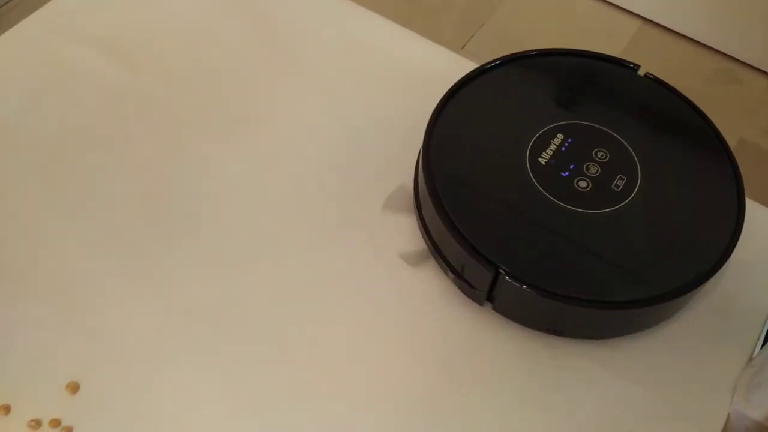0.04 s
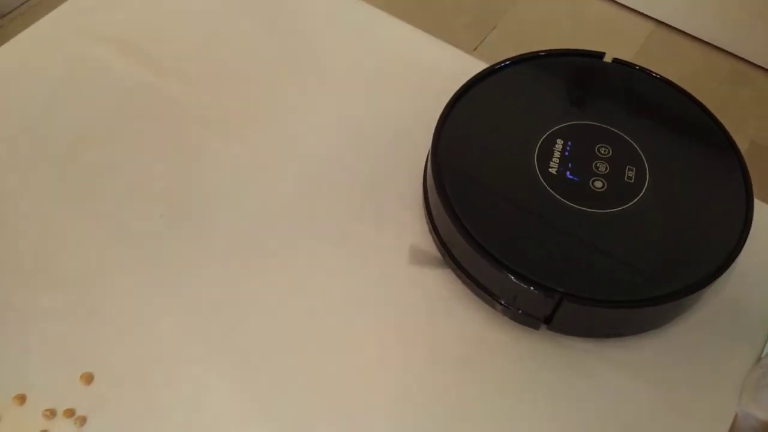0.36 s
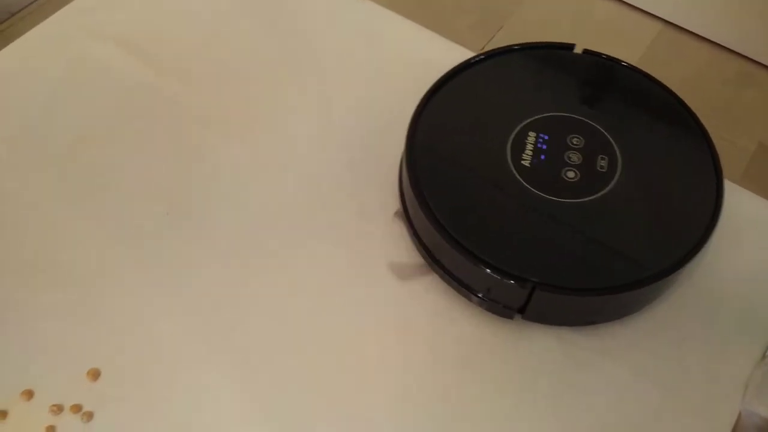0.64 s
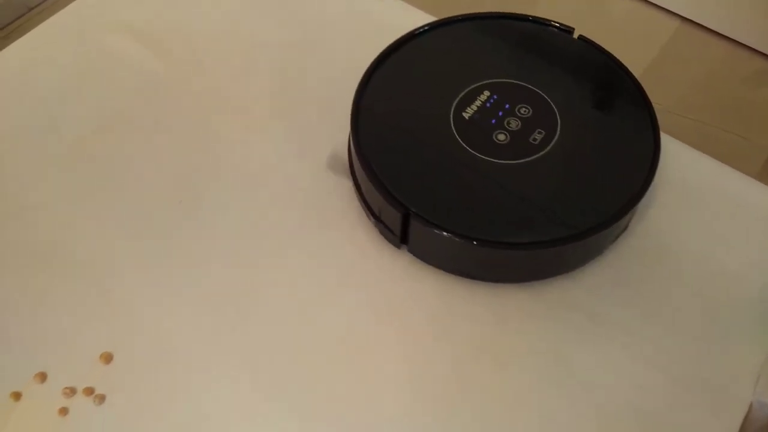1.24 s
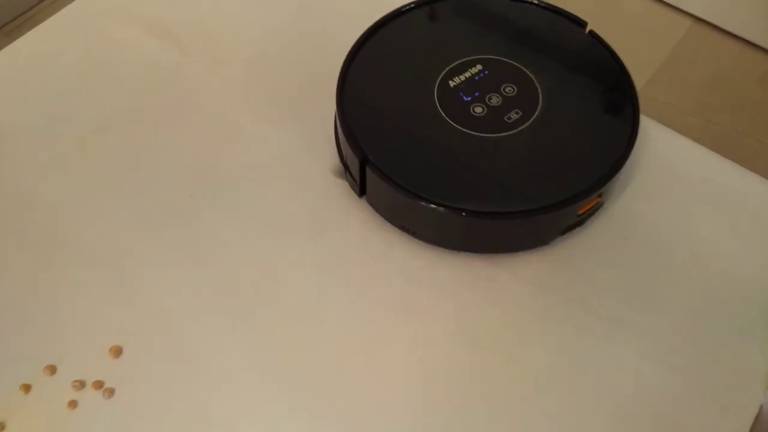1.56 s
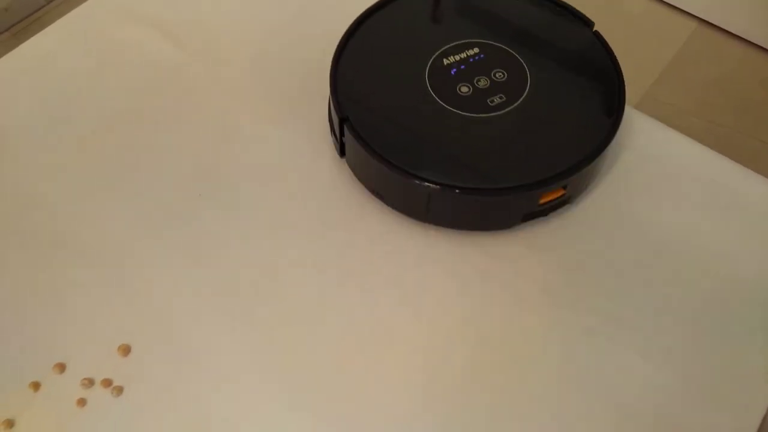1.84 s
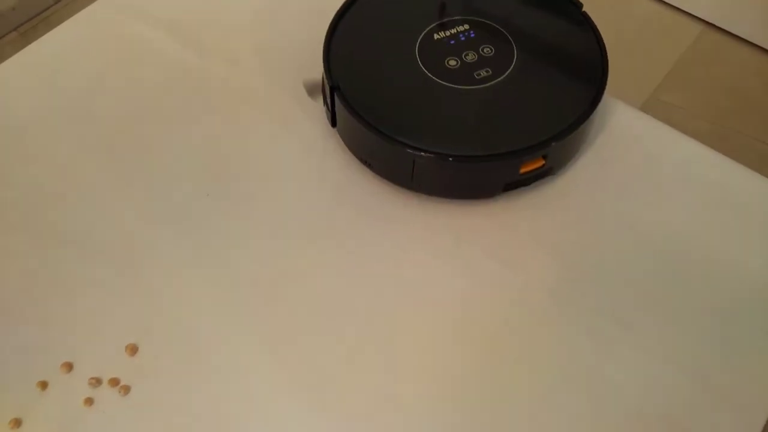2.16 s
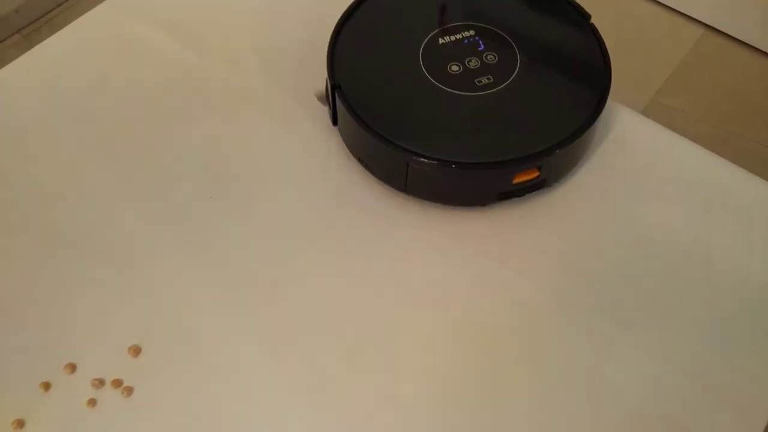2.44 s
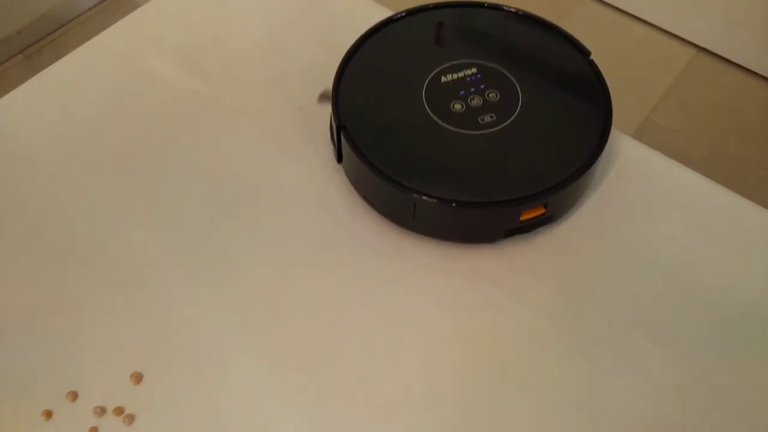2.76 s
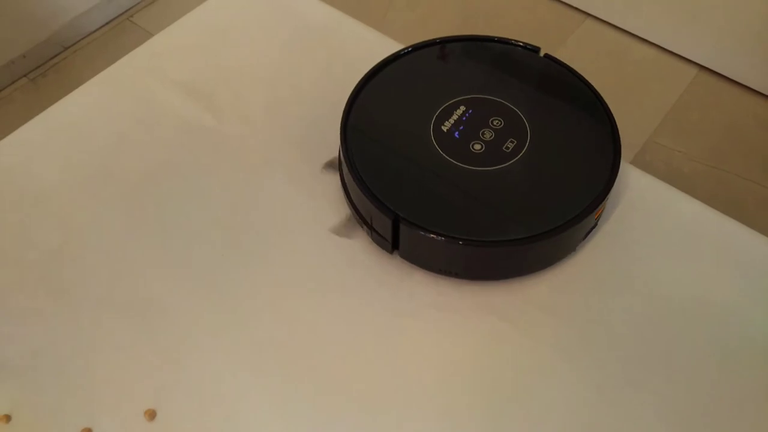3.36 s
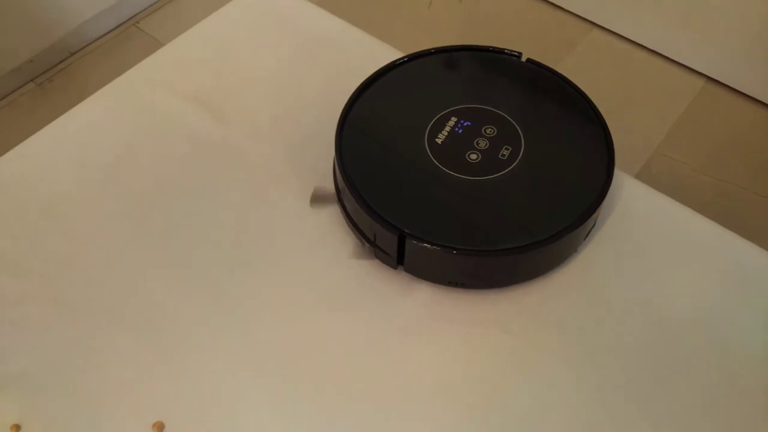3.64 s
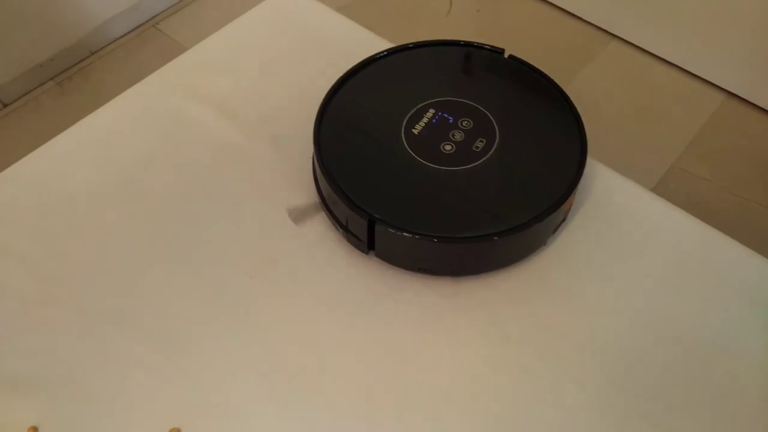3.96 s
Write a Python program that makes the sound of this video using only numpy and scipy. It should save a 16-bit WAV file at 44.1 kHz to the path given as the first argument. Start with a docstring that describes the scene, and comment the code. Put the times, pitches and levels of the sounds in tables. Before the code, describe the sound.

A robot vacuum runs on a smooth indoor floor about a metre away. Its fan and small motors whine steadily over rushing air, with brief faint squeals and soft bumps, while a side brush hisses on the left.

```python
"""On a smooth floor in a room, a robot vacuum turns about a metre from the listener.
Its fan and small motors whine at harmonics of their shaft speeds, over the broadband rush of turbulent air.
The roller brush and gears drive the plastic shell into resonance, and rubbing parts squeal briefly.
The side brush hisses by friction on the left, swelling each time a tuft sweeps out from under the body."""
import sys
import numpy as np
from scipy import signal
from scipy.fft import rfft, irfft
from scipy.io import wavfile

SR = 44100
rng = np.random.default_rng(int(sys.argv[2]) if len(sys.argv) > 2 else 0)


def master_out(mix):
    """Clip the mix to full scale and print it as 16-bit PCM to the path in sys.argv[1]."""
    frames = np.transpose(np.atleast_2d(mix))
    ceiling = np.clip(frames, -1, 1)
    pcm = np.round(ceiling * 32767).astype(np.int16)
    wavfile.write(sys.argv[1], SR, pcm)


N = 176400

# shaft speeds: (time [s], rotation rate [Hz])
FAN_SPEED = [(0, 166.2), (.22, 165.1), (.35, 165.8), (.52, 164.6), (.9, 165.7), (1.5, 166.3), (1.65, 166),
             (2, 166.7), (2.9, 167), (3.25, 166.9), (3.45, 166.3), (3.62, 165), (3.8, 166), (4, 165.7)]
ROLLER_SPEED = [(0, 207.7), (.5, 207), (1.3, 211.2), (2.2, 212.4), (3, 210.6), (4, 209.4)]
WHEEL_SPEED = [(0, 274), (.6, 273), (1.2, 275.3), (1.7, 274), (2.05, 275), (2.35, 277), (2.8, 273.5),
               (3.1, 273.5), (3.6, 271), (3.75, 274), (4, 274)]
# meshing in the pushing wheel's gearbox: (time [s], tooth rate [Hz])
TOOTH_RATE = [(0, 680), (.85, 682), (.95, 692), (1.08, 693), (1.25, 709), (1.36, 700), (1.5, 707),
              (1.75, 694), (1.85, 692), (2.3, 712), (3.6, 700), (3.72, 688), (3.8, 718), (3.95, 708),
              (4, 708)]
# harmonics of those rates: (multiple [1], base level [dB], left minus right [dB])
FAN_HUM = [(4, -45, 2)]
FAN_WHINE = [(8, -44, -1.1)]
FAN_OVERTONES = [(6, -61, -23), (9, -50, -13), (10, -62, -10), (11, -61.5, 12), (12, -50.5, 3),
                 (18, -67.5, 20)]
ROLLER_WHINE = [(2, -55.5, -4), (4, -47.5, 1)]
WHEEL_HUM = [(2, -46.5, 2), (4, -51.5, -11)]
WHEEL_WHINE = [(6, -47, 5.6)]
GEARBOX_WHINE = [(1, -40.5, -1), (2, -51, -3), (3, -61, 6)]
GEARBOX_RASP = [(6, -52, 6), (7, -57, 7)]
# steady meshing tones: (frequency [Hz], level [dB], left minus right [dB])
GEAR_TONES = [(266.4, -52, 6), (284, -52, -3), (345.8, -50, 3), (1053, -57, -13), (1183, -53.5, -9),
              (1250, -52, -14.5), (1744, -60.5, 12), (2106, -70, -12)]

# resonances excited by noise: (frequency [Hz], nominal width [Hz], base level [dB])
SHELL_BASS_MODES = [(260, 20, -48), (321.2, 11, -51)]
RATTLE_MODES = [(699, 36, -47), (750, 54, -41.5), (835, 63, -43.5)]
DUCT_MODES = [(1560, 220, -51.5), (2770, 260, -47.5)]
WHIR_MODES = [(1690, 39, -48.5)]
BEARING_MODES = [(2020, 110, -45)]
GEAR_HISS_MODES = [(4480, 280, -51.5), (5000, 1000, -54.5)]
# noise spectra: (frequency [Hz], relative spectral density [dB])
AIR_SPECTRUM = [(25, -42), (80, -57), (115, -47), (160, -20), (220, -5), (370, -2.5), (490, -4.5), (620, 0),
                (920, 1), (1050, -2), (1300, 2.5), (1850, -1.5), (2400, -5), (3300, -6), (4500, -9),
                (5600, -10), (6800, -12.5), (10000, -16), (16000, -26)]
BRISTLE_SPECTRUM = [(2000, -43), (4000, -15.5), (7000, -12), (9400, -7.5), (10600, -2), (11600, 1.5),
                    (12800, -1), (14200, -5), (15600, -13.5)]

# rise and fall of each part about its base level as the body turns: (time [s], gain [dB])
FAN_HUM_GAIN = [(0, -4), (.22, 0.5), (.42, -4.5), (.6, 3.5), (1, -9), (1.7, -1), (2.5, -3), (3.35, -0.5),
                (3.6, 1.5), (3.75, 2), (4, -3)]
FAN_WHINE_GAIN = [(0, -5), (.27, 0), (.4, -13), (.62, 0.5), (1, 1.5), (1.4, 6), (1.65, 0.5), (1.95, 2),
                  (2.1, -14), (2.6, -16), (2.9, -1.5), (3.25, -2), (3.45, -7), (3.6, 0.5), (4, -3)]
FAN_OVERTONE_GAIN = [(0, -2), (.7, 2.5), (1.25, 2), (1.8, 2.5), (2.4, 1.5), (3.2, -1), (4, 1)]
ROLLER_GAIN = [(0, -6), (.9, -6), (1.3, -2), (2.2, 0), (3, 2), (3.7, 2), (4, -1)]
WHEEL_HUM_GAIN = [(0, -8), (.6, -6), (1.3, -5), (2, -2), (2.6, -2), (2.8, 0), (3.2, 0), (3.6, 1), (3.8, -4),
                  (4, -5)]
WHEEL_WHINE_GAIN = [(0, -5), (.85, -8), (1.2, 3), (1.55, -12), (1.8, -5), (2.35, 1.5), (2.6, -8), (4, -12)]
GEARBOX_WHINE_GAIN = [(0, -20), (.8, -16), (.95, 0), (1.25, 2), (1.36, -2), (1.52, -.5), (1.75, -2),
                      (2, -15), (3.6, -18), (3.8, -9), (4, -9)]
GEARBOX_RASP_GAIN = [(0, -18), (.8, -14), (.97, 2), (1.25, 0), (1.6, -4), (1.82, 4), (2, -15), (3.6, -18),
                     (3.75, 1), (4, 3)]
SHELL_BASS_GAIN = [(0, 4), (1, -2), (2, 0), (2.8, 0.5), (4, 1.5)]
RATTLE_GAIN = [(0, -3), (.45, -10.5), (.62, 0.5), (.85, -4.5), (1.2, 1), (2, -1), (2.7, 1), (3.2, 0.5),
               (3.6, -2.5), (4, -7)]
WHIR_GAIN = [(0, 5), (.8, -36), (1.5, -6), (2.1, 7.5), (2.5, 7), (2.8, 2), (3.2, 4), (3.5, -7), (3.85, 6)]
BEARING_GAIN = [(0, -1), (.35, 3), (.9, 3.5), (1.4, -3), (1.8, -4), (2.6, 0.5), (3.3, 3.5), (4, -6)]
GEAR_HISS_GAIN = [(0, -18), (.5, -2), (1, 4), (1.6, 1), (2.1, 2), (3, -18), (3.6, -8), (3.9, 5), (4, 7)]
AIR_GAIN = [(0, -0.34), (.4, -0.85), (1.1, 1), (1.7, 0.58), (2.4, -0.33), (3.3, -0.57), (3.6, 0.081),
            (4, 1)]
# swell of the hiss at each sweep, greatest while the brush faces the listener: (time [s], rise [dB])
SWEEP_RISE = [(0, 2), (.5, 2), (.8, 3), (1.35, 3), (1.9, 0.5), (2.6, 0.5), (3.3, 0.5), (3.65, 1.3),
              (3.92, 2)]

# squeals of rubbing parts: (peak time [s], frequency [Hz], Gaussian half width [s], peak level [dB])
SQUEALS = [(.047, 832, .02, -37), (.118, 834, .014, -36), (.267, 833, .022, -33.5), (.36, 830, .018, -39.5),
           (.43, 830, .012, -40.5), (.515, 832, .01, -40), (.708, 836, .013, -33), (.798, 838, .014, -33),
           (1.045, 849, .01, -38), (1.121, 838, .012, -36), (1.19, 832, .014, -37), (2.03, 846, .014, -39),
           (2.275, 841, .012, -38), (2.64, 750, .016, -35), (2.66, 846, .012, -38), (2.743, 837, .012, -39),
           (2.915, 775, .012, -37), (2.952, 842, .012, -38), (3.061, 837, .012, -38),
           (3.236, 844, .013, -37), (1.196, 1995, .012, -38), (1.428, 2010, .009, -42),
           (.61, 4470, .016, -47), (.65, 4100, .014, -50), (1.46, 4450, .018, -48), (1.55, 4490, .016, -46)]
# booms of the shell when the chassis bumps: (peak time [s], frequency [Hz], peak level [dB])
BUMPS = [(.33, 335, -41), (1.245, 255, -39), (1.89, 274, -42), (2.482, 275, -39), (2.81, 269, -35),
         (2.963, 275, -41.5), (3.414, 273, -38), (3.525, 275, -41), (3.817, 258, -40), (3.885, 264, -39)]

# likeness of the sound at the two ears: (frequency [Hz], correlation [1])
EAR_COHERENCE = [(100, -0.5), (280, 0.7), (550, 0.36), (800, 0.9), (1200, 0), (2000, 0.05), (5000, 0),
                 (15000, -0.5)]
# balance of noise between the ears: (frequency [Hz], left minus right [dB])
EAR_BALANCE = [(100, 10), (200, 4), (300, 3.5), (550, -4.5), (1200, 3.5), (1800, 1.5), (3500, 2), (6000, 6),
               (12000, 5.5)]


def from_db(db):
    """Amplitude ratio: tenfold for every 20 dB."""
    return 10 ** (np.asarray(db) / 20)


def unit_power(x):
    """Normalisation to a mean square of one."""
    return x / np.sqrt(np.mean(x ** 2) + 1e-20)


def seconds():
    """Uniform sampling: the time of every sample."""
    return np.arange(N) / SR


def bins():
    """Fourier analysis: the frequency of every bin, at least 1 Hz."""
    return np.maximum(np.arange(N // 2 + 1) * SR / N, 1)


def in_time(rows):
    """Linear interpolation of (time [s], value) rows."""
    return np.interp(seconds(), *np.transpose(rows))


def envelope(rows):
    """Amplitude envelope from (time [s], gain [dB]) rows."""
    return from_db(in_time(rows))


def over_hz(rows):
    """Interpolation of (frequency [Hz], value) rows on a logarithmic axis."""
    hz, value = np.transpose(rows)
    return np.interp(np.log(bins()), np.log(hz), value)


def pan(db):
    """Interaural level difference as left and right gains."""
    return from_db(np.array([[.5], [-.5]]) * db)


def drift(corner_hz):
    """Low-pass noise: a random wander of unit spread."""
    spectrum = rfft(rng.standard_normal(N)) * (bins() > 1)
    return unit_power(irfft(spectrum / (1 + (bins() / corner_hz) ** 2), N))


def room_noise(colour):
    """Partial coherence: coloured noise of unit power whose likeness at the ears varies with frequency."""
    mid, side = rfft(rng.standard_normal((2, N)))
    coherence = over_hz(EAR_COHERENCE)
    ears = np.sqrt(1 + coherence) * mid + np.sqrt(1 - coherence) * side * np.array([[1], [-1]])
    return unit_power(irfft(ears * colour * pan(over_hz(EAR_BALANCE)), N))


def resonances(modes):
    """Resonance: noise excites steep-sided modes whose powers add."""
    f, power = bins(), 0
    for hz, width, db in modes:
        detuning = (f * f - hz * hz) / (f * width * 1.5)
        response = unit_power(1 / (1 + detuning ** 2))
        power = power + (from_db(db) * response) ** 2
    return np.sqrt(np.mean(power)) * room_noise(np.sqrt(power))


def phase(hz, wobble, wobble_hz):
    """Phase is the integral of frequency, which here trembles by the fraction `wobble`."""
    return 2 * np.pi * np.cumsum(hz * (1 + wobble * drift(wobble_hz))) / SR


def partial(angle, hz, db, pan_db, fade_db):
    """Interference of reflections makes a tone fade and shift between the ears as the body moves."""
    coherence = np.interp(hz, bins(), over_hz(EAR_COHERENCE))
    phase_gap = np.arccos(coherence) * (rng.choice([-1, 1]) * 0.57 + 0.4 * drift(3.3))
    wave = np.sin(angle + rng.uniform(0, 2 * np.pi) + phase_gap * np.array([[.5], [-.5]]))
    return from_db(db) * pan(pan_db) * unit_power(wave * from_db(fade_db * drift(2.8)))


def harmonics(rate_rows, orders, wobble, wobble_hz, fade_db):
    """Periodic motion radiates at whole multiples of its repetition rate."""
    rate = in_time(rate_rows)
    angle = phase(rate, wobble, wobble_hz)
    return sum(partial(k * angle, k * rate.mean(), db, pan_db, fade_db) for k, db, pan_db in orders)


def with_reflections(direct):
    """Comb filtering: floor and wall echoes join the treble, their paths changing as the body moves."""
    echoes_per_ear, echo_gain = 7, 0.15
    shortest_s, longest_s, swing_s = 0.00099, .014, 0.00021
    t, out = seconds(), direct.copy()
    treble = signal.sosfilt(signal.butter(2, 1440, "high", fs=SR, output="sos"), direct)
    for ear in range(2):
        for delay, swing in rng.uniform([shortest_s, -1], [longest_s, 1], (echoes_per_ear, 2)):
            lag = delay + swing_s * swing * np.cos(np.pi * t / t[-1])
            out[ear] += echo_gain * np.interp(t - lag, t, treble[ear], left=0)
    return out


def gear_hiss():
    """Band-limited noise: a high, raspy hiss from the wheel's gearbox swells and fades."""
    return envelope(GEAR_HISS_GAIN) * resonances(GEAR_HISS_MODES)


def bearing():
    """Rolling contact: a bearing gives a narrow band of noise."""
    return envelope(BEARING_GAIN) * resonances(BEARING_MODES)


def squeals():
    """Friction-induced vibration: rubbing parts sing for a moment at an unsteady pitch."""
    out = 0
    for peak_s, hz, half_width_s, db in SQUEALS:
        swell = np.exp(-.5 * ((seconds() - peak_s) / half_width_s) ** 2)
        tone = unit_power(np.sin(phase(hz, wobble=.013, wobble_hz=160)))
        out = out + from_db(db) * swell * tone
    return out


def bumps():
    """Transient response: each bump builds a low boom in the shell that peaks and dies away."""
    rise_s, out = 0.014, 0
    for peak_s, hz, db in BUMPS:
        age = np.maximum((seconds() - peak_s) / rise_s + 1, 0)  # 0 at onset, 1 at the peak
        swell = (age * np.exp(1 - age)) ** 2
        boom = unit_power(np.sin(2 * np.pi * hz * seconds() + rng.uniform(0, 2 * np.pi)))
        out = out + from_db(db) * swell * boom
    return out


def gears():
    """Tooth meshing: the drive trains give steady tones and a resonant whir."""
    whir = envelope(WHIR_GAIN) * resonances(WHIR_MODES)
    tones = sum(partial(phase(hz, wobble=0.0055, wobble_hz=23), hz, db, pan_db, fade_db=2)
                for hz, db, pan_db in GEAR_TONES)
    return whir + tones


def wheel_motor():
    """Shaft harmonics: a thin hum, with a higher whine that comes and goes during the turn."""
    hum = harmonics(WHEEL_SPEED, WHEEL_HUM, wobble=.0015, wobble_hz=8, fade_db=0.2)
    whine = harmonics(WHEEL_SPEED, WHEEL_WHINE, wobble=.0015, wobble_hz=8, fade_db=0.2)
    return envelope(WHEEL_HUM_GAIN) * hum + envelope(WHEEL_WHINE_GAIN) * whine


def roller_motor():
    """Frequency modulation: the roller motor's whine wavers as its speed trembles under load."""
    whine = harmonics(ROLLER_SPEED, ROLLER_WHINE, wobble=0.006, wobble_hz=38, fade_db=2)
    return envelope(ROLLER_GAIN) * whine


def gearbox():
    """Mesh harmonics: the pushing wheel's loaded gears sing on low multiples and rasp on high ones."""
    whine = harmonics(TOOTH_RATE, GEARBOX_WHINE, wobble=.004, wobble_hz=25, fade_db=0.2)
    rasp = harmonics(TOOTH_RATE, GEARBOX_RASP, wobble=.011, wobble_hz=120, fade_db=2)
    return envelope(GEARBOX_WHINE_GAIN) * whine + envelope(GEARBOX_RASP_GAIN) * rasp


def shell():
    """Forced vibration: the roller beats on the floor, so the plastic shell throbs and rattles."""
    knock_hz, knock_depth = 18, 0.12
    knocks = 1 + knock_depth * np.cos(phase(knock_hz, wobble=0.048, wobble_hz=2.6))
    throb = envelope(SHELL_BASS_GAIN) * knocks * resonances(SHELL_BASS_MODES)
    rattle = envelope(RATTLE_GAIN) * resonances(RATTLE_MODES)
    return throb + rattle


def side_brush():
    """Friction noise: bristles scrape the floor with a fine grain; each passing tuft swells the hiss."""
    first_s, period_s, half_width_s = 0.23, .2845, 0.034
    base_db, pan_db, grain_db = -40.5, 19, 0.5
    from_sweep_s = (seconds() - first_s + period_s / 2) % period_s - period_s / 2
    sweep_db = in_time(SWEEP_RISE) * np.exp(-.5 * (from_sweep_s / half_width_s) ** 2)
    scrape = rng.standard_normal((2, N)) * from_db(grain_db * drift(400))
    hiss = unit_power(irfft(rfft(scrape) * from_db(over_hz(BRISTLE_SPECTRUM)), N))
    return from_db(base_db + sweep_db) * pan(pan_db) * hiss


def fan():
    """Directivity: the suction fan's hum and octave whine are beamed, so they vary as the body turns."""
    parts = [(FAN_HUM, FAN_HUM_GAIN, 0.2), (FAN_WHINE, FAN_WHINE_GAIN, 0.2),
             (FAN_OVERTONES, FAN_OVERTONE_GAIN, 2)]
    return sum(envelope(gain) * harmonics(FAN_SPEED, orders, wobble=.0013, wobble_hz=14, fade_db=fade_db)
               for orders, gain, fade_db in parts)


def airflow():
    """Turbulence: air rushes through the ducts and excites their modes; the level flickers slightly."""
    base_db, flicker_db = -33, 0.87
    rush = from_db(base_db) * room_noise(from_db(over_hz(AIR_SPECTRUM)))
    ducts = resonances(DUCT_MODES)
    return envelope(AIR_GAIN) * from_db(flicker_db * drift(46)) * (rush + ducts)


def scene():
    """Superposition: motors, drive, shell, air and brush add as sound pressures."""
    motors = fan() + roller_motor() + wheel_motor()
    drive = gearbox() + gears() + bearing() + gear_hiss() + squeals()
    return motors + drive + shell() + bumps() + with_reflections(airflow() + side_brush())


def record(dry):
    """Band limiting: a steep elliptic low-pass removes the highest treble."""
    cutoff_hz = 15750
    return signal.sosfilt(signal.ellip(12, .1, 80, cutoff_hz, fs=SR, output="sos"), dry)


dry = scene()
out = record(dry)
master_out(out)
```